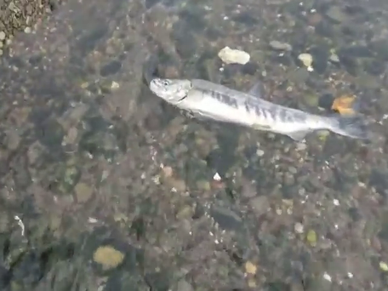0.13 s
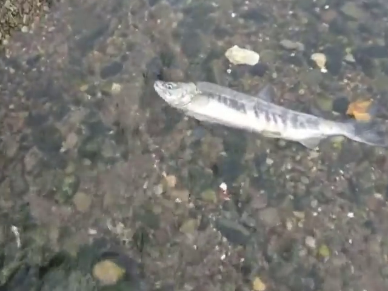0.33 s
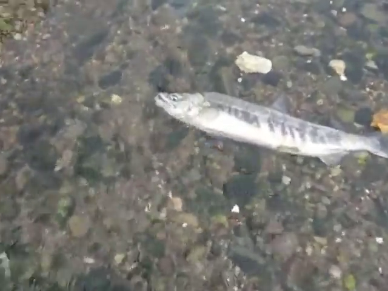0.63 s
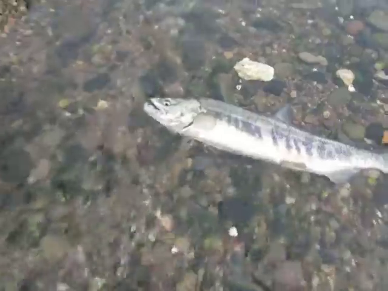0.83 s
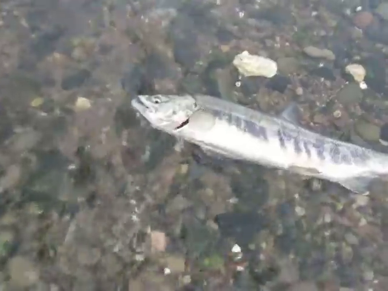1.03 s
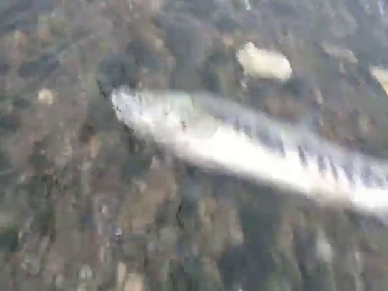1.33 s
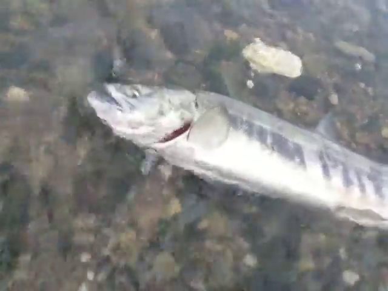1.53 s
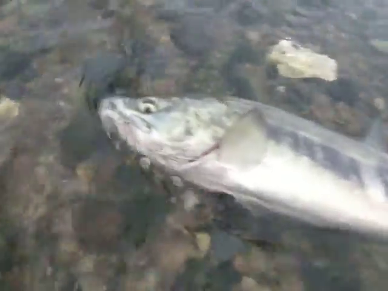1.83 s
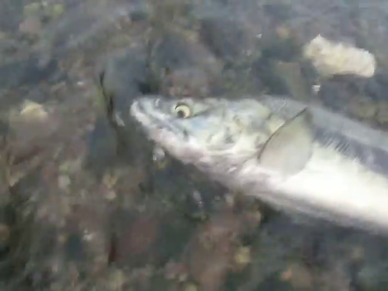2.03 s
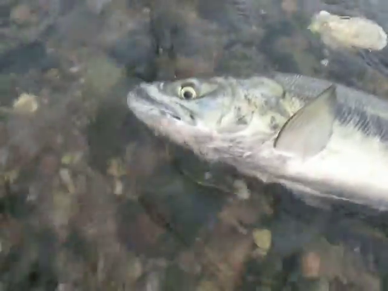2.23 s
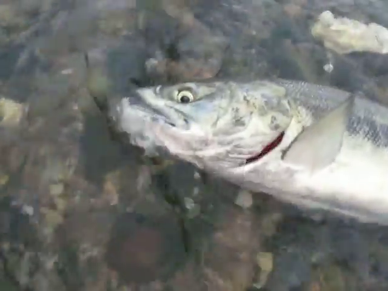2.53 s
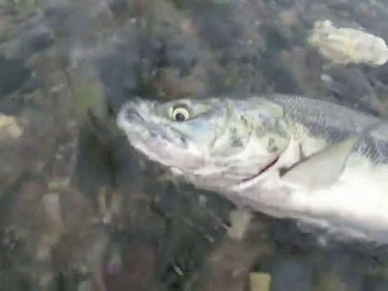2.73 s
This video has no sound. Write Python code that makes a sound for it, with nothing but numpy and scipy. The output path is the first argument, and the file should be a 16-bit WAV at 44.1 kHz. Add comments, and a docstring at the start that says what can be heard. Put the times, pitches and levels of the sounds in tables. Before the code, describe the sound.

Close, light trickle of a pebbly stream, with bright spray early and rounder bubbles later; midway, a handheld camera body clicks loudly three times and its button once, over faint hiss in mono.

```python
"""A shallow stream over pebbles, close by: a soft wash, many small bubbles, tiny spray ticks.
Wash is shaped noise; bubbles, spray and froth are damped sines; splashes are noise bursts.
A handheld plastic camera clicks four times (body three, button one): struck decaying modes.
A faint hum and a thin whine sit underneath, with a steady hiss."""
import sys
import numpy as np
from scipy import signal
from scipy.fft import rfft, irfft
from scipy.io import wavfile
from scipy.ndimage import uniform_filter1d

SR = 44100
rng = np.random.default_rng(int(sys.argv[2]) if len(sys.argv) > 2 else 0)


def generate_wav(signal):
    """Clip the signal to [-1, 1] and save it as 16-bit WAV at the path in sys.argv[1]."""
    frames = np.transpose(np.atleast_2d(signal))
    scaled = np.clip(frames, -1, 1) * 32767
    pcm = np.round(scaled).astype(np.int16)
    wavfile.write(sys.argv[1], SR, pcm)


def invert_db(x):
    """Field ratio 10**(x/20) for x, a level in decibels (scalar or array-like)."""
    u = np.asarray(x, float) / 20
    return 10 ** u


N = 126567

# Hiss spectrum. Each row: frequency in Hz, relative density in dB.
HISS_SPECTRUM = [(6000, -21), (11000, -5), (11600, -12), (11800, -33), (12000, -6), (12700, 2), (15600, -4),
                 (15900, -40)]
# Hum and whine. Each row: frequency in Hz, noise half-width in Hz, level in dB rms, noise share.
TONES = [(58, 7.9, -66, .6), (120.5, 12, -57, .65), (5880, 2.3, -66, 0.41)]
# Camera clicks. Each row: start in seconds, peak in dB, tilt in dB per octave about 3 kHz,
# knock level in dB, part (0 body, 1 button).
CLICKS = [(1.4658, -2.5, 1.5, -4, 0), (1.6157, -4, 0, -2, 0), (1.7086, -10, -1, 0, 0),
          (1.9892, -11.5, 0, -12, 1)]
# Softer knocks in each click. Each row: delay in seconds, level in dB, contact time in seconds.
KNOCKS = [(.00122, -5, .00004), (.00255, -1, .0001), (.0043, -6, .00009), (.0062, -15, .0001),
          (.009, -21, .0001)]
# Camera body modes. Each row: frequency in Hz, relative level in dB, T60 in seconds.
BODY_MODES = [(1610, -14.5, 0.0049), (2330, -3.5, 0.0097), (2820, -1.5, 0.0067), (3480, -3.5, 0.0085),
              (4240, -5, 0.0095), (5000, -2, 0.0083), (5310, 0.5, 0.0054), (8000, -14, .004),
              (9620, 4, 0.0055), (13100, 1.5, 0.0016)]
# Small button modes. Each row: frequency in Hz, relative level in dB, T60 in seconds.
BUTTON_MODES = [(2400, -8, 0.016), (2770, 0.5, 0.019), (3200, -2.5, 0.018), (4050, 0, .016),
                (4600, -10, 0.013), (6000, -21, 0.0041), (9670, 1, 0.0074), (13500, -16, .002)]
# Farther stream's wash spectrum. Each row: frequency in Hz, relative density in dB.
WASH_SPECTRUM = [(12, -48), (20, -12), (119, -6), (278, -8), (477, -14), (571, -9.5), (1030, -4.5),
                 (3050, -13.5), (4160, -17), (6290, -20), (9500, -16), (12400, -37), (16000, -25.5)]
# Random bubble sizes. Each row: pitch in Hz, relative level in dB.
BABBLE_SIZES = [(350, -12), (600, -4), (1000, 2.6), (1800, 6.5), (3000, 2.5), (5000, -1)]
# Random spray sizes. Each row: pitch in Hz, relative level in dB.
SPRAY_SIZES = [(2500, -11.5), (4000, -3), (6500, 0.5), (9500, 2), (14000, 1)]
# Bursting froth crackle sizes. Each row: pitch in Hz, relative level in dB.
CRACKLE_SIZES = [(3000, -20), (6000, -12), (9500, -10), (13000, 10), (16000, 4)]
# Spray and crackle against the flow. Each row: time in seconds, gain in dB.
SPRAY_GAIN = [(0, 5), (1.0, 2.5), (1.45, 0), (1.75, -2.5), (2.3, -5), (2.45, -2.5), (2.55, -10), (2.87, -6)]
# Flow. Each row: time in seconds, gain in dB.
FLOW_GAIN = [(0.0, -43.5), (1.02, -43), (1.27, -43.5), (1.42, -41.5), (2.2, -43.5), (2.5, -44), (2.87, -43)]
# Small splashes. Each row: start in seconds, length in seconds, level in dB, centre in Hz.
SPLASHES = [(0.048, 0.039, -39.5, 5000), (0.085, 0.047, -35, 3850), (0.365, 0.042, -43, 3040),
            (0.588, 0.067, -44, 4100), (1.334, 0.045, -37.5, 3500), (2.381, 0.032, -42.5, 4940),
            (2.554, 0.017, -43.5, 7000), (2.618, 0.011, -40.5, 6000), (2.738, 0.013, -40, 3950)]
# Sliding gurgles. Each row: start in seconds, length in seconds, level in dB, first pitch in Hz,
# last pitch in Hz.
GURGLES = [(0.048, 0.034, -38, 1985, 1440), (0.079, 0.025, -40.5, 1310, 1000),
           (0.469, 0.019, -41, 1416, 1620), (0.605, 0.016, -41.5, 2170, 2700),
           (0.65, 0.027, -38, 1253, 1035), (0.683, 0.043, -44, 422, 520), (0.738, 0.045, -46.5, 956, 1020),
           (1.336, 0.018, -38.5, 2720, 3200), (1.365, 0.025, -43, 1500, 1220),
           (1.612, 0.026, -39.5, 554, 612), (1.727, 0.0079, -30, 1700, 1900),
           (2.036, 0.02, -33, 1066, 2580), (2.428, 0.024, -38, 1005, 1350), (2.476, 0.026, -43, 1175, 1280),
           (2.536, .012, -40.5, 2530, 2840), (2.619, 0.02, -42, 1046, 1130)]
# Single bubbles. Each row: start in seconds, level in dB, first pitch in Hz, length in cycles,
# pitch rise as a share.
BUBBLES = [(0.037, -29, 2020, 18, 0.18), (0.175, -38, 1005, 26, 0.15), (0.195, -26, 3000, 9.4, 0.077),
           (0.24, -41, 970, 43, 0.13), (0.369, -37, 1280, 54, 0.11), (0.41, -30.5, 2950, 38, 0.17),
           (0.45, -33.5, 890, 34, 0.19), (0.506, -35, 1440, 22, 0.074), (0.519, -35, 848, 48, 0.32),
           (0.811, -36, 2310, 22, 0.15), (0.85, -28, 2070, 17, 0.12), (0.914, -37, 1580, 46, 0.15),
           (0.96, -34, 1510, 25, 0.12), (1.003, -38, 2080, 24, 0.017), (1.047, -39, 810, 24, 0.15),
           (1.062, -33, 1990, 31, 0.25), (1.172, -31, 754, 46, 0.43), (1.217, -33, 2700, 12, 0.1),
           (1.229, -37, 1570, 22, 0.1), (1.24, -26.5, 2850, 21, 0.12), (1.258, -29, 1740, 30, 0.15),
           (1.279, -32, 1353, 50, 0.27), (1.317, -31.5, 1550, 47, 0.26), (1.398, -39, 2700, 18, 0.1),
           (1.416, -34, 2300, 16, 0.1), (1.432, -32, 1770, 64, 0.19), (1.508, -37, 2100, 16, 0.1),
           (1.505, -38.5, 660, 35, 0.071), (1.545, -42, 1600, 47, 0.094), (1.577, -33, 1690, 24, 0.15),
           (1.669, -33, 1940, 36, 0.046), (1.778, -35.5, 660, 17, 0.15), (1.794, -26.5, 2040, 24, 0.14),
           (1.855, -31, 1666, 33, 0.11), (1.865, -31, 1450, 24, 0.1), (1.914, -28.5, 1514, 52, 0.034),
           (1.938, -34, 2350, 22, 0.1), (1.965, -34, 2400, 36, 0.023), (1.992, -37, 508, 37, 0.24),
           (2.101, -38.5, 1230, 29, 0.066), (2.135, -33.5, 1760, 36, 0.1), (2.157, -35, 1240, 20, 0.039),
           (2.222, -38, 1350, 18, 0.13), (2.259, -36, 642, 52, 0.085), (2.264, -33.5, 1940, 16, 0.13),
           (2.283, -35, 3360, 22, 0), (2.288, -34.5, 2260, 26, 0.05), (2.296, -35, 980, 18, 0.052),
           (2.308, -39.5, 4500, 24, 0), (2.385, -36, 1570, 30, 0.11), (2.415, -31, 2980, 17, 0),
           (2.433, -32.5, 3200, 27, 0.05), (2.463, -32, 2490, 24, 0.033), (2.509, -44, 2920, 30, 0),
           (2.565, -38, 2360, 11, 0.19), (2.567, -35, 1030, 13, 0.1), (2.6645, -33, 2080, 47, 0.13),
           (2.7144, -28, 3560, 32, 0), (2.741, -31, 2780, 12, 0), (2.802, -43, 1395, 36, 0.083),
           (2.822, -33.5, 2470, 20, 0.14), (2.844, -27, 2820, 33, 0.12)]
# Single spray ticks. Each row: time in seconds (1 ms before onset), ring level in dB, pitch in Hz,
# length in cycles.
TICKS = [(0.0508, -21, 3850, 5.1), (0.091, -30, 5180, 10), (0.1141, -28, 7400, 10),
         (0.1461, -8.5, 5500, 4.4), (0.2174, -30, 8000, 13), (0.2443, -32, 5940, 10),
         (0.2651, -26, 4050, 6.9), (0.277, -30, 6140, 8.8), (0.3057, -24, 4600, 6), (0.3185, -28, 9000, 9),
         (0.3221, -17, 8800, 7.2), (0.3524, -25, 7900, 11), (0.3694, -27, 4900, 9), (0.3835, -28, 8000, 12),
         (0.4896, -38, 8440, 10), (0.396, -36, 11000, 10), (0.5115, -27, 9300, 12), (0.5224, -30, 8450, 12),
         (0.531, -31, 10500, 8), (0.549, -31, 8800, 10), (0.599, -24, 6300, 6.3), (0.6035, -29, 4970, 5.7),
         (0.6534, -28, 8800, 12), (0.755, -32, 3170, 11), (0.7956, -33, 8500, 7), (0.8096, -26, 7900, 10),
         (0.8247, -28, 9100, 10), (0.848, -29, 8800, 11), (0.9168, -28.5, 6540, 9.9),
         (0.9353, -34, 7400, 10), (0.9932, -29, 4800, 16), (1.0364, -28, 7200, 14), (1.049, -33, 3730, 29),
         (1.1149, -34, 8740, 12), (1.1408, -33, 8610, 12), (1.169, -29, 7260, 18),
         (1.2254, -25.5, 7200, 6.5), (1.2397, -26, 8900, 18), (1.276, -27, 5400, 12),
         (1.4798, -24.5, 3760, 14), (1.4955, -31.5, 5500, 20), (1.6452, -31, 9140, 16),
         (1.6525, -32, 8500, 8), (1.7297, -30, 3220, 6.6), (1.8098, -33, 6760, 16), (1.839, -31, 5540, 17),
         (1.851, -33, 7300, 12), (1.9202, -25.5, 7950, 9.7), (1.9729, -21, 6900, 7.4),
         (2.1231, -24, 10600, 20), (2.15, -30.5, 8050, 17), (2.2615, -28.5, 10300, 14),
         (2.356, -29, 7550, 9), (2.375, -29, 8500, 9), (2.385, -28, 4600, 10), (2.401, -33.5, 5040, 19),
         (2.4227, -30, 7190, 14), (2.5042, -8, 6970, 14), (2.56, -33, 8000, 14), (2.574, -27, 11000, 12),
         (2.594, -33, 11000, 10), (2.6468, -26, 9800, 13), (2.682, -34, 11500, 8), (2.7115, -37, 9500, 8.7),
         (2.7416, -27.5, 8000, 6.5), (2.803, -28, 6000, 7.1), (2.809, -29, 9450, 12),
         (2.821, -25.5, 7100, 6.8), (2.8255, -38, 11500, 8), (2.8439, -31, 7000, 8), (2.8645, -33, 8040, 8)]
# Microphone response. Each row: frequency in Hz, gain in dB.
MIC_RESPONSE = [(8000, -1.5), (9800, 0), (10600, -3), (11400, -12), (11800, -27), (12100, -18),
                (13000, -16.5), (15500, -29), (16300, -40), (16700, -118)]


def evened(x):
    """Scales to rms 1."""
    return x / np.sqrt(np.mean(x ** 2) + 1e-20)


def read(points, hz):
    """Reads a spectrum table on a log-frequency axis."""
    f, value = np.transpose(points)
    return np.interp(np.log(hz + 1), np.log(f + 1), value)


def shaped_noise(spectrum):
    """White noise filtered to a spectrum table, rms 1."""
    gain = invert_db(read(spectrum, np.fft.rfftfreq(N, 1 / SR)))
    return evened(irfft(rfft(rng.standard_normal(N)) * gain, N))


def smooth(x, size):
    """Two running means along the last axis."""
    return uniform_filter1d(uniform_filter1d(x, size), size)


def uneven(count, span_s):
    """One smooth random wander per event, rms 1 over all."""
    return evened(smooth(rng.standard_normal((count, 6000)), max(round(span_s * SR), 1)))


def add(mix, s, sound):
    """Mixes a sound in at time s."""
    part = mix[max(round(s * SR), 0):][:len(sound)]
    part += sound[:len(part)]


def grain(hz, cycles, rise, soft_cycles):
    """A damped sine whose pitch climbs while it dies; soft_cycles sets the attack."""
    u = np.arange(int(max(cycles, 2) * SR / hz) + 2) * hz / SR
    attack = 1 - np.exp(-u / max(soft_cycles, 0.05))
    shape = attack * invert_db(-60 * u / max(2 * cycles, 2))
    shape *= np.cos(np.pi / 2 * u / u[-1])
    phase_cycles = u + rise * u ** 2 / (2 * u[-1])
    return shape / shape.max() * np.sin(2 * np.pi * phase_cycles)


def swarm(sizes, per_s, spread_db, cycles, rise, soft_cycles, clump_db, count=40):
    """Many grains of random pitch and size, in loose clumps of level, rms 1."""
    out = np.zeros(N)
    clump = invert_db(clump_db * evened(smooth(rng.standard_normal(N), 700)))
    chance, size, kind = rng.random((3, N))
    excess_db = spread_db * np.minimum(-np.log(size + 1e-9), 3.5)
    strikes = invert_db(excess_db) * clump * (chance < per_s / SR)
    pitch = (kind * count).astype(int)
    for k, hz in enumerate(np.geomspace(sizes[0][0], sizes[-1][0], count)):
        a, b = rng.random(2)
        one = invert_db(read(sizes, hz)) * grain(hz, cycles * (0.5 + a), rise * 2 * b, soft_cycles)
        out += signal.oaconvolve(strikes * (pitch == k), one)[:N]
    return evened(out)


def hiss():
    """Steady shaped noise."""
    return invert_db(-70.5) * shaped_noise(HISS_SPECTRUM)


def tones():
    """Wavering narrow tones: a steady sine plus a narrow band of noise."""
    t, f = np.arange(N) / SR, np.fft.rfftfreq(N, 1 / SR)
    out = np.zeros(N)
    for hz, width_hz, db, waver in TONES:
        band = 1 / (1 + ((f - hz) / width_hz) ** 4)
        fuzz = evened(irfft(rfft(rng.standard_normal(N)) * band, N))
        sine = np.sin(2 * np.pi * (hz * t + rng.random()))
        out += invert_db(db) * evened(waver * fuzz + sine)
    return out


def clicks():
    """A sharp snap and a few softer knocks ring the struck part of the camera."""
    snap_delay_s, snap_contact_s = 0.00055, 0.00002
    noise_db, noise_t60_s = -18.5, 0.01
    lead_s = 0.0002  # added to every delay
    out, t = np.zeros(N), np.arange(1200) / SR
    high = signal.butter(4, 1350, "high", fs=SR, output="sos")
    noises = rng.standard_normal((len(CLICKS), 1200))
    for (s, db, tilt_db, knock_db, part), noise in zip(CLICKS, noises):
        ring = np.zeros(1200)
        for hz, mode_db, t60_s in (BODY_MODES, BUTTON_MODES)[part]:
            level_db = mode_db + tilt_db * np.log2(hz / 3000)
            ring += invert_db(level_db - 60 * t / t60_s) * np.cos(2 * np.pi * hz * t)
        ring = ring / ring[0] + invert_db(noise_db - 60 * t / noise_t60_s) * noise
        hits = [(snap_delay_s, 0, snap_contact_s)]
        hits += [(delay_s, hit_db + knock_db, contact_s) for delay_s, hit_db, contact_s in KNOCKS]
        force = np.zeros(1200)
        for delay_s, hit_db, contact_s in hits:
            pulse = np.exp(-((t - delay_s - lead_s) / contact_s) ** 2)
            force += invert_db(hit_db) * pulse * np.sqrt(snap_contact_s / contact_s)
        click = signal.sosfilt(high, np.convolve(force, ring)[:1200])
        add(out, s, invert_db(db) * click / np.abs(click).max())
    return out


def wash():
    """Farther stream: noise with drifting patches and a flicker that is full above 4 kHz."""
    patchy_db, flicker_db = 1.5, 3
    frames, hz = N // 128 + 5, np.fft.rfftfreq(512, 1 / SR)
    a, b, patches = rng.standard_normal((frames, 257, 3)).T
    patches = evened(uniform_filter1d(uniform_filter1d(patches, 6, 0), 12, 1))
    flicker = evened(uniform_filter1d(rng.standard_normal(frames), 3))
    flicker = flicker * np.clip(hz / 4000, 0, 1)[:, None]
    z = (a + 1j * b) * invert_db(patchy_db * patches + flicker_db * flicker)
    x = signal.istft(z, nperseg=512, noverlap=384)[1][:N]
    return evened(irfft(rfft(x) * invert_db(read(WASH_SPECTRUM, np.fft.rfftfreq(N, 1 / SR))), N))


def babble():
    """Random bubbles: soft-edged grains that rise in pitch."""
    return swarm(BABBLE_SIZES, per_s=1200, spread_db=3.5, cycles=30.5, rise=0.246,
                 soft_cycles=1.3, clump_db=2.25)


def spray():
    """Random droplets: short, high grains."""
    return swarm(SPRAY_SIZES, per_s=2600, spread_db=3, cycles=17.5, rise=0.32,
                 soft_cycles=1.0, clump_db=3)


def crackle():
    """Bursting froth: sparse grains of very few cycles."""
    return swarm(CRACKLE_SIZES, per_s=250, spread_db=7, cycles=2.1, rise=0.11,
                 soft_cycles=0.22, clump_db=1)


def splashes():
    """Grainy bursts of noise where water slops over a stone."""
    width_octaves, grain_db = 1.44, 8.5
    out, hz = np.zeros(N), np.fft.rfftfreq(3000, 1 / SR)
    noises = rng.standard_normal((len(SPLASHES), 2, 3000))
    for (s, length_s, db, centre_hz), (a, b) in zip(SPLASHES, noises):
        a = a * invert_db(grain_db * evened(uniform_filter1d(b, 50)))
        band = np.exp(-(np.log2((hz + 1) / centre_hz) / width_octaves) ** 2)
        a = evened(irfft(rfft(a) * band))
        u = np.arange(0, 1, 1 / (length_s * SR))[:3000]
        add(out, s, invert_db(db) * np.sin(np.pi * u ** 0.26) * a[:len(u)])  # fast rise, slow fall
    return out


def gurgles():
    """Short sliding tones of slopping water, with level flutter and pitch wobble."""
    flutter_db, wobble_share = 2.5, 0.029
    out = np.zeros(N)
    flutters, wobbles = uneven(len(GURGLES), 0.0014), uneven(len(GURGLES), 0.0026)
    for (s, length_s, db, from_hz, to_hz), flutter, wobble in zip(GURGLES, flutters, wobbles):
        u = np.arange(0, 1, 1 / (length_s * SR))
        pitch_hz = from_hz * (to_hz / from_hz) ** u * (1 + wobble_share * wobble[:len(u)])
        level = invert_db(db + flutter_db * flutter[:len(u)]) * np.sin(np.pi * u ** 0.88) ** 0.66
        add(out, s, level * np.sin(2 * np.pi * np.cumsum(pitch_hz) / SR))
    return out


def bubbles():
    """Single bubbles: damped sines, most rising in pitch, with level flutter."""
    flutter_db = 1.3
    out = np.zeros(N)
    for (s, db, hz, cycles, rise), flutter in zip(BUBBLES, uneven(len(BUBBLES), 0.0014)):
        one = grain(hz, cycles, rise, soft_cycles=0.53)
        add(out, s, invert_db(db + flutter_db * flutter[:len(one)]) * one)
    return out


def ticks():
    """Single spray ticks: a short ring, a high-passed noise burst with a tail, a sharp edge."""
    lag_s, edge_db, noise_gain = 0.001, 7, 0.19
    tail_db, tail_t60_s = -13, 0.013
    out, t = np.zeros(N), np.arange(1500) / SR
    impulse = 1.0 * (t == 0)
    for (s, db, hz, cycles), noise in zip(TICKS, rng.standard_normal((len(TICKS), 1500))):
        high = signal.butter(4, 0.84 * hz, "high", fs=SR, output="sos")
        noise = evened(signal.sosfilt(high, noise))
        edge = invert_db(edge_db) * signal.sosfilt(high, impulse)
        burst = noise_gain * invert_db(-60 * t * hz / max(cycles, 1))
        burst += invert_db(tail_db - 60 * t / tail_t60_s)
        add(out, s + lag_s, invert_db(db) * grain(hz, cycles, 0.011, 0.81))
        add(out, s + lag_s, invert_db(db) * (burst * noise + edge))
    return out


def stream():
    """Wash, babble, spray and crackle follow the flow; single bubbles and ticks stand out."""
    t = np.arange(N) / SR
    spray_db = np.interp(t, *np.transpose(SPRAY_GAIN))
    water = invert_db(-2.5) * wash() + invert_db(-2.5) * babble()
    water += invert_db(-7 + spray_db) * spray()
    water += invert_db(-13.5 + spray_db) * crackle()
    water *= invert_db(np.interp(t, *np.transpose(FLOW_GAIN)))
    return water + bubbles() + ticks()


def scene():
    """Tones, camera clicks, splashes, gurgles and stream, in mono."""
    return (tones() + clicks() + splashes() + gurgles() + stream())[None]


def microphone(x):
    """Causal (minimum-phase) filter with the microphone's response."""
    log_gain = np.log(invert_db(read(MIC_RESPONSE, np.abs(np.fft.fftfreq(4096, 1 / SR)))))
    taps = np.fft.ifft(np.exp(np.conj(signal.hilbert(log_gain)))).real[:2048]
    return signal.oaconvolve(x, taps[None])[:, :N]


def low_pass(x):
    """Removes everything above the highest recorded frequency."""
    return signal.sosfilt(signal.butter(12, 16500, fs=SR, output="sos"), x)


def record(dry):
    """Microphone colour, then steady hiss on top."""
    mix = microphone(dry) + hiss()
    return low_pass(mix)


dry = scene()
out = record(dry)
generate_wav(out)
```